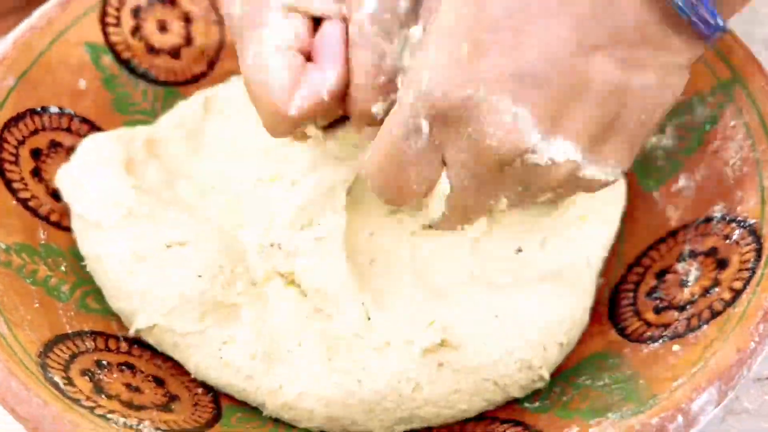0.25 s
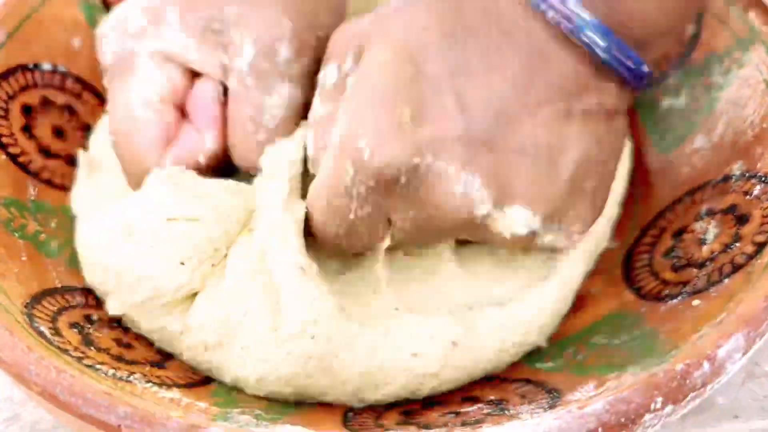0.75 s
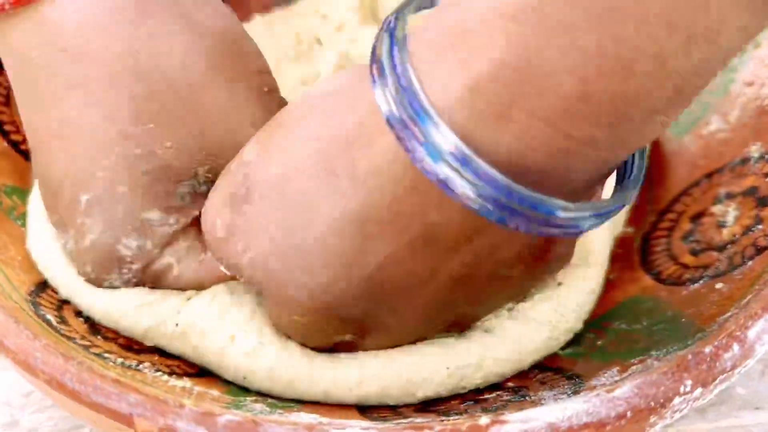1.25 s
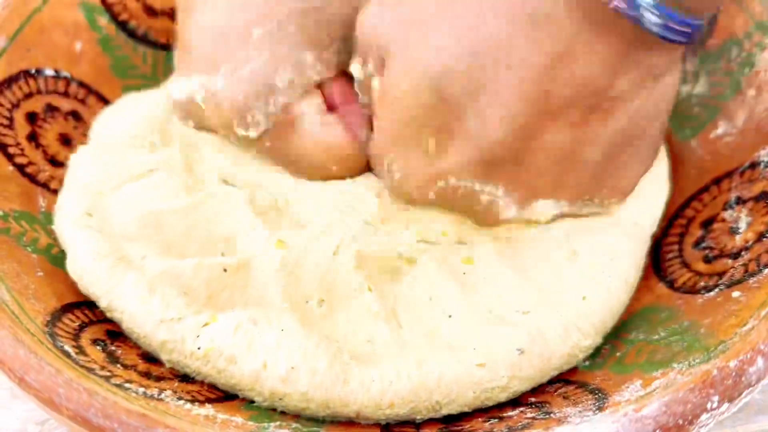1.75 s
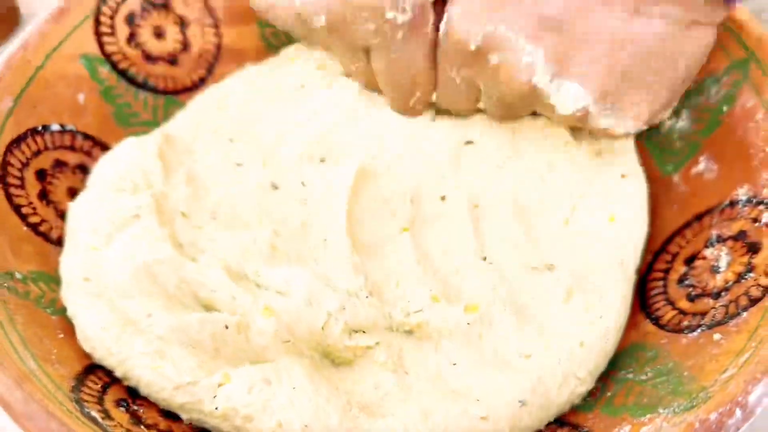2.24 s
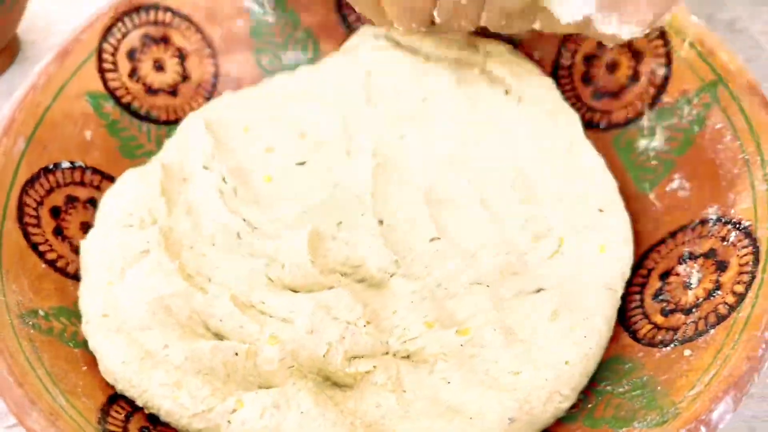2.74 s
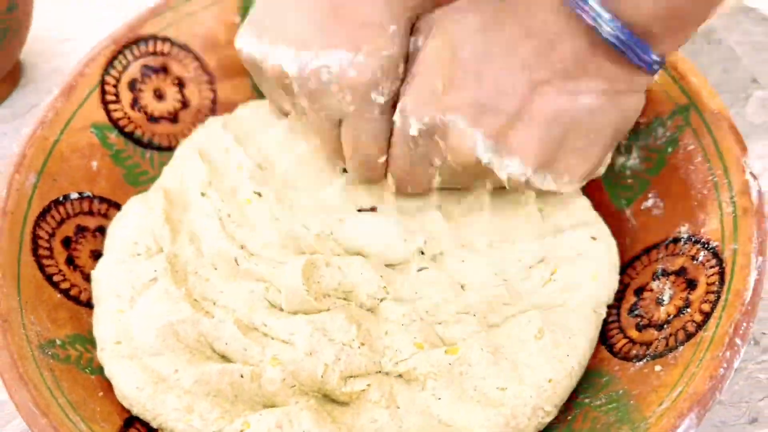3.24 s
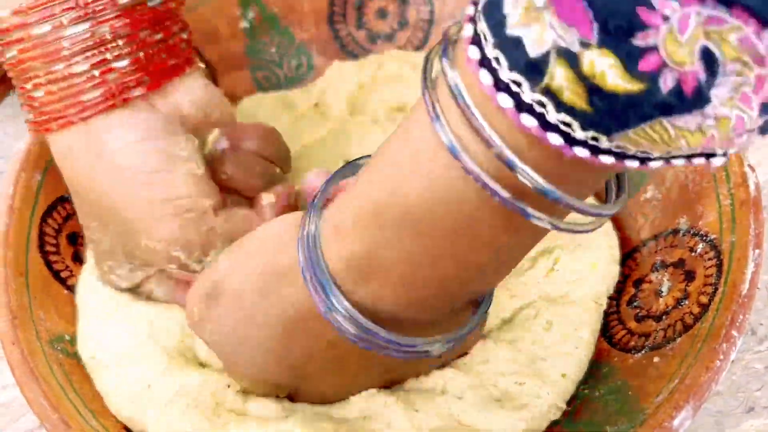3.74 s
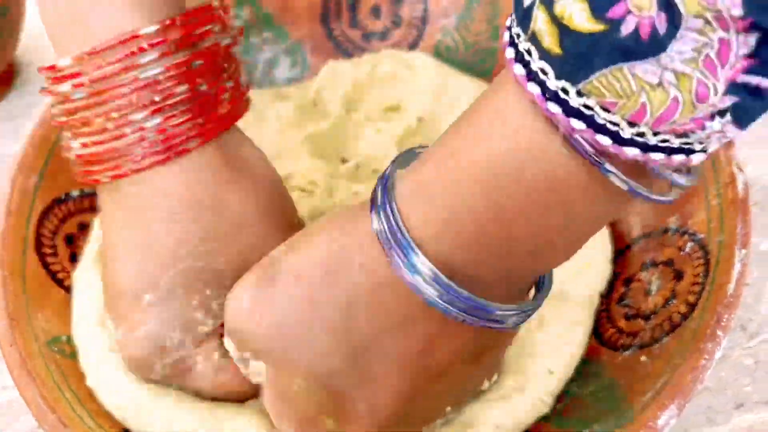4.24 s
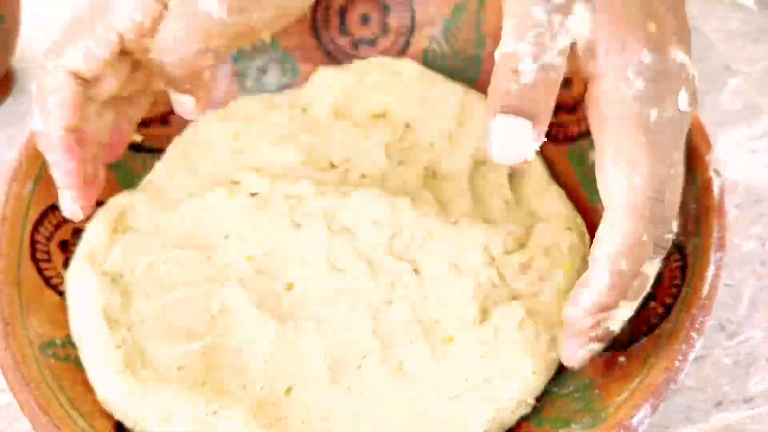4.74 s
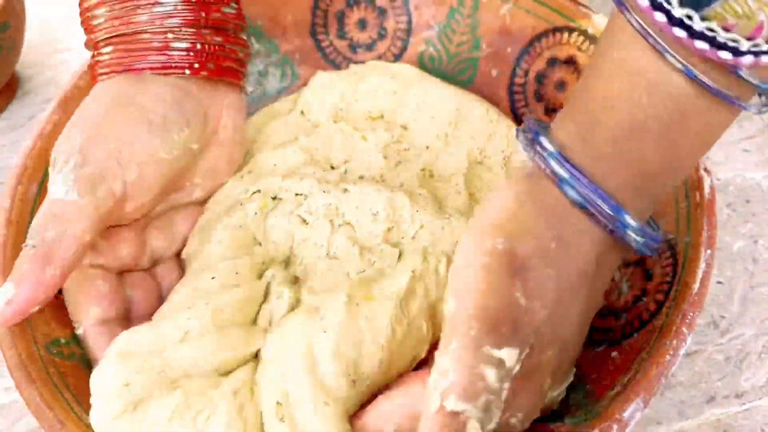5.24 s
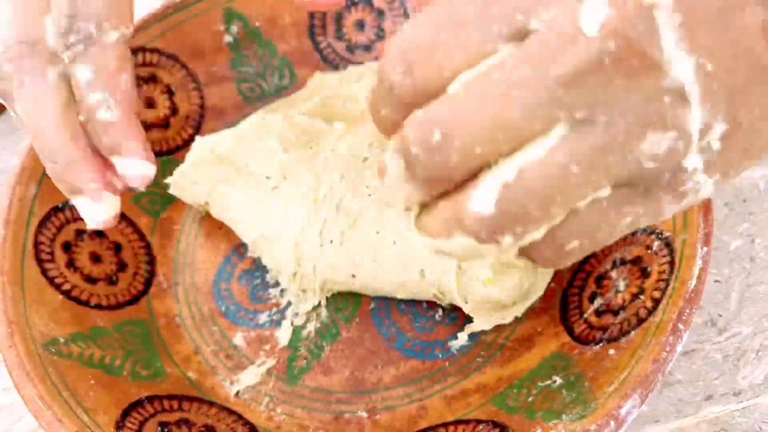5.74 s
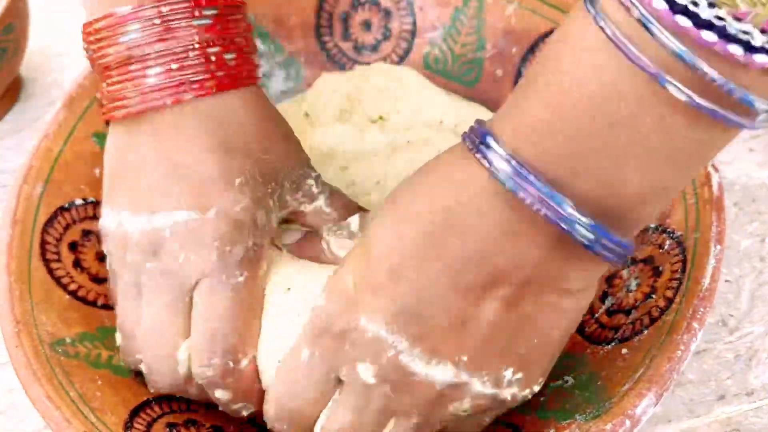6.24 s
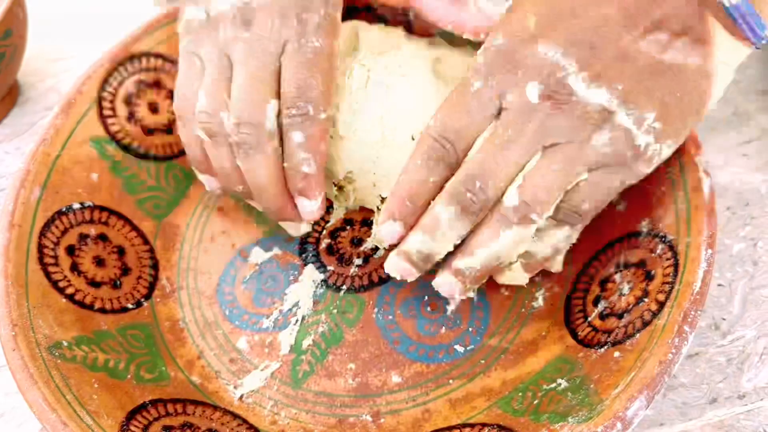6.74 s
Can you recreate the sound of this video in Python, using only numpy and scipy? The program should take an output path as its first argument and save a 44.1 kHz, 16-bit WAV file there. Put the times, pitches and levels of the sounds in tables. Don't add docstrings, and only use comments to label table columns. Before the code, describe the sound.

Close kneading of sticky dough, dull punches and peeling crackles, topped by sharp glassy bangle jingles and hard knocks on clay, in an open yard.

```python
import sys
import numpy as np
from scipy import signal
from scipy.fft import rfft, irfft
from scipy.io import wavfile
from scipy.ndimage import uniform_filter1d

SR = 44100
rng = np.random.default_rng(int(sys.argv[2]) if len(sys.argv) > 2 else 0)


def gain_from_decibels(decibels):
    exponent = np.asarray(decibels, float) / 20
    return 10 ** exponent


def to_wav(s):
    ch = np.atleast_2d(s).T
    pcm = np.round(np.clip(ch, -1, 1) * 32767)
    wavfile.write(sys.argv[1], SR, pcm.astype(np.int16))


N = 307818

# frequency in Hz, level in dB, decay time t60 in s.
STACK_MODES = [(7634, -8, 0.048), (8490, 0, 0.025), (8670, -8.5, 0.14), (9170, -5.5, 0.16),
               (9690, 2, 0.038), (10210, -1, 0.024), (13420, -2, .04), (12034, 3.5, 0.04),
               (12570, 2, 0.045), (14120, 6, .06), (14220, 2.5, 0.044), (14750, -0.5, 0.05),
               (15770, 4.5, 0.061), (15280, 0.5, 0.033)]


def evened(x):
    return x / np.sqrt(np.mean(x ** 2) + 1e-20)


def read(points, hz):
    f, value = np.transpose(points)
    return np.interp(np.log(hz + 1), np.log(f + 1), value)


def curve(rows, column):
    rows = np.array(rows)
    return np.interp(np.arange(N) / SR, rows[:, 0], rows[:, column])


def add(mix, s, sound):
    part = mix[round(s * SR):][:len(sound)]
    part += sound[:len(part)]


def coloured(x, points):
    response = gain_from_decibels(read(points, np.fft.rfftfreq(N, 1 / SR)))
    return evened(irfft(rfft(x) * response, N))


def resonate(x, hz, width):
    turn = np.exp(2j * np.pi * np.cumsum(hz * np.ones(len(x))) / SR)
    r = np.exp(-np.pi * width / SR)
    return 2 * (turn * signal.lfilter([1 - r], [1, -r], x / turn)).real


def rings(hz, db, t60, spread_db, rise, size=6000):
    t = np.arange(size) / SR
    luck = rng.standard_normal((2, len(hz), 1))
    level_db = db[:, None] + spread_db * luck[0] - 60 * t / t60[:, None]
    modes = gain_from_decibels(level_db) * np.sin(2 * np.pi * hz[:, None] * t + 3 * luck[1])
    return modes.sum(0) * (1 - np.exp(-t / rise))


def grains(per_s, spread_db, bed):
    size = gain_from_decibels(spread_db * np.minimum(rng.exponential(1, N), 4))
    return rng.standard_normal(N) * (size * (rng.random(N) < per_s / SR) + bed)


def air():
    # frequency in Hz, level in dB per Hz.
    mid_spectrum = [(25, -39.5), (40, -4.5), (55, 0.5), (100, -3), (200, -15), (500, -25), (930, -34.5),
                    (2500, -38), (5600, -48.5), (9000, -50), (10200, -63.5), (11300, -91), (12500, -66),
                    (15000, -66)]
    side_spectrum = [(24, -32), (40, 5.5), (104, -2), (800, -15), (1520, -17), (4100, -27.5), (9900, -33.5),
                     (14500, -49)]
    # time in s, level in dB.
    traffic = [(0, -1), (.8, 2.5), (2.2, 1.5), (3.4, -3), (6.2, -1.5), (6.98, -1.5)]
    mid = gain_from_decibels(-44) * coloured(rng.standard_normal(N), mid_spectrum)
    side = gain_from_decibels(-55) * coloured(rng.standard_normal(N), side_spectrum)
    hz, _, z = signal.stft(np.array([mid + side, mid - side]), SR, nperseg=1024)
    patches = uniform_filter1d(rng.standard_normal(z.shape[1:]), size=9, axis=0)
    patches = uniform_filter1d(patches, size=9, axis=1)
    z = z * gain_from_decibels(2.2 * evened(patches) * (hz[:, None] > 200))
    return gain_from_decibels(curve(traffic, 1)) * signal.istft(z, SR, nperseg=1024)[1][:, :N]


def engine():
    # time in s, pitch in Hz, level in dB.
    low = [(0, 46.7, -48.5), (.6, 51.7, -36), (1.2, 51.4, -37.5), (2.2, 58.1, -40), (3.2, 57.3, -42.5),
           (4.4, 52.9, -39), (5.4, 51.2, -44.5), (6.98, 55.25, -42.5)]
    high = [(0.0, 92.6, -43), (1.38, 93.2, -41), (4.74, 93.4, -43), (6.59, 97, -38), (6.98, 94.7, -39)]
    rev = [(5.6, 105.6, -69), (5.85, 113.3, -42), (6.1, 132.7, -39.5), (6.3, 120.4, -41.5),
           (6.45, 115, -39.5), (6.6, 128.7, -41.5), (6.8, 117.8, -43), (6.98, 103.5, -48.5)]
    out = np.zeros(N)
    # track, harmonic order, bandwidth in Hz, level in dB
    for rows, order, width, db in (low, 1, 7., 0), (high, 1, 12., 0), (rev, 1, 14., 0), (rev, 2, 50., -14.):
        hz = order * curve(rows, 1)
        tone = resonate(rng.standard_normal(N), hz, width)
        tone = evened(resonate(tone, hz, width))
        steady = tone / np.sqrt(uniform_filter1d(tone ** 2, size=6000) + 0.24)
        out += gain_from_decibels(curve(rows, 2) + db) * steady
    return out


def far_calls():
    # start in s, length in s, frequency in Hz, level in dB.
    calls = [
        (1.69, 0.23, 1665, -50),
        (3.445, 0.36, 1523, -47.5),
        (4.168, 0.23, 1920, -60),
        (5.75, 0.46, 1630, -50.5),
        (2.4, .16, 2800, -57),
        (.75, .5, 460, -54.5),
        (1.5, .35, 830, -57.5),
        (.55, .4, 640, -58),
        (3.0, 0.14, 850, -65),
    ]
    out = np.zeros(N)
    for s, length, hz, db in calls:
        band = resonate(rng.standard_normal(round(length * SR)), hz, 180)
        band = evened(resonate(band, hz, 180))
        add(out, s, gain_from_decibels(db) * band * signal.windows.tukey(len(band), .4))
    return out


def thuds():
    # start in s, peak in dB, centre in Hz, length in s.
    landings = [(0.125, -29.5, 510, 0.066), (0.739, -33.5, 494, 0.098), (0.849, -33, 437, 0.056),
                (1.034, -37, 474, 0.072), (1.357, -33.5, 549, 0.065), (1.623, -24.5, 628, 0.0053),
                (1.969, -29.5, 665, 0.051), (2.254, -32, 583, 0.013), (2.599, -36.5, 606, 0.052),
                (3.203, -33.5, 383, 0.019), (3.831, -24.5, 374, 0.015), (4.436, -30, 468, 0.055),
                (4.53, -37, 660, 0.012), (4.873, -27, 690, 0.039), (5.923, -20, 930, 0.03),
                (6.38, -40, 850, 0.052), (1.22, -38, 2430, 0.0053), (4.435, -25, 3010, 0.0059),
                (5.634, -30.5, 1140, 0.0077)]
    out, t = np.zeros(N), np.arange(5000) / SR
    for s, db, hz, length in landings:
        decay = gain_from_decibels(-30 * t / max(length, .004))
        puff = rng.standard_normal(len(t)) * decay * (1 - np.exp(-t / 0.0018))
        puff = resonate(puff, hz, 0.72 * hz)
        puff = resonate(puff, hz, 0.77 * hz)
        add(out, s, gain_from_decibels(db - 1.0) * puff / abs(puff).max())
    return out


def effort():
    # time in s, settling time in s, jingle in dB, crackle in dB.
    pushes = [(0, 0.44, -62, -53.5), (0.134, 0.19, -37.5, -38.5), (.41, 0.43, -49.5, -57),
              (0.731, .19, -36.5, -40), (.87, .08, -43.5, -50), (1.363, 0.087, -33, -35.5),
              (1.72, 0.24, -54, -51.5), (1.954, 0.85, -37.5, -41.5), (2.168, 0.092, -57, -67),
              (2.338, 0.88, -55, -54), (2.868, 0.55, -60, -58.5), (3.202, 0.16, -40, -41.5),
              (3.51, 0.38, -69, -58.5), (3.93, 0.15, -45, -46), (4.55, 0.053, -60, -59.5),
              (4.93, 0.75, -77, -54.5), (5.37, 0.13, -43.5, -49), (6.12, 0.065, -55, -57),
              (6.41, 0.14, -43, -52), (6.59, 0.11, -40, -60.5), (6.68, .2, -61.5, -66.5)]
    # time in s, swelling time in s, jingle in dB, crackle in dB.
    pulls = [(1.43, .08, -53, -49), (1.52, 0.098, -41.5, -45), (1.67, 0.085, -48, -50),
             (2.3, 0.05, -32.5, -52), (2.62, 0.099, -35, -38), (3.345, 0.1, -51.5, -49),
             (4.25, 0.29, -44, -52.5), (.3, 0.1, -48.5, -44), (5.33, 0.59, -56, -56.5),
             (5.549, 0.36, -50.5, -55.5), (5.86, .06, -53.5, -59), (6.037, 0.13, -36.5, -38),
             (6.392, 0.23, -37.5, -42)]
    # time in s, settling time in s, jingle in dB, crackle in dB.
    slaps = [
        (1.024, 0.23, -42.5, -51),
        (3.831, 0.085, -32.5, -34.5),
        (4.087, 0.22, -43.5, -59),
        (4.432, 0.18, -38, -40.5),
        (4.873, .07, -50, -40.5),
        (5.763, 0.19, -42, -64),
        (5.924, .12, -49, -50.5),
        (6.842, 0.12, -41, -42.5),
        (6.942, .16, -37.5, -49),
    ]
    push_rise_s, slap_rise_s, free_s = 0.047, 0.006, 0.048
    t, power = np.arange(0, N + 64, 64) / SR, 0
    moves = [(s, push_rise_s, slow, db) for s, slow, *db in pushes]
    moves += [(s, slow, free_s, db) for s, slow, *db in pulls]
    moves += [(s, slap_rise_s, slow, db) for s, slow, *db in slaps]
    for s, rise, fall, db in moves:
        away = np.maximum((s - t) / max(rise, .004), (t - s) / max(fall, .01))
        power = power + gain_from_decibels(np.array(db)[:, None] - 23.5 * away ** 1.366) ** 2
    clumps = evened(uniform_filter1d(rng.standard_normal((2, len(t))), size=5, axis=1))
    gains = gain_from_decibels(3.2 * clumps) * np.sqrt(power)
    return [np.interp(np.arange(N) / SR, t, gain) for gain in gains]


def kneading():
    # frequency in Hz, level in dB per Hz.
    jingle_spectrum = [(4500, -30.5), (6500, -11), (9000, -5), (11500, -10.5), (14500, -6), (16000, -13)]
    crackle_spectrum = [(200, -27.5), (500, -3.5), (1200, -2.5), (2900, -4.5), (5600, -9), (10000, -7.5)]
    squish_spectrum = [(150, -18), (450, -8), (1500, -24.5)]
    hz, db, t60 = np.transpose(STACK_MODES + STACK_MODES)
    own_hz = hz * (1 + 0.018 * rng.standard_normal(len(hz)))
    touches = np.zeros(N)
    for mode_hz, mode_db, mode_t60 in zip(own_hz, db, t60):
        touches += gain_from_decibels(mode_db) * resonate(grains(120, 2.5, 0.03), mode_hz, 3.0 / mode_t60)
    jingle = evened(.9 * evened(touches) + coloured(grains(4000, 3.2, .25), jingle_spectrum))
    dough = coloured(grains(2200, 3.3, 0.25), crackle_spectrum)
    dough = dough + gain_from_decibels(-8.5) * coloured(grains(600, 3.0, 0.17), squish_spectrum)
    shake, press = effort()
    shake = np.minimum(shake, gain_from_decibels(-34))
    return gain_from_decibels(1.0) * shake * jingle + gain_from_decibels(-1.3) * press * dough


def knocks():
    # start in s, peak in dB, then relative levels in dB of the
    strikes = [(0.2011, -10.5, -2, -1.5, -15), (0.2083, -19, -11.5, 1.5, -13.5),
               (2.029, -8.5, -10, -1, -8.5), (2.0416, -18, -0.5, -36, -23), (2.098, -42, -20, -20, -30),
               (2.126, -32.5, -20.5, -21, -30), (2.172, -33, -22, -24, -30), (2.203, -50, -20, -20, -30),
               (2.254, -24.5, -11.5, -9, -27), (3.2482, -12, -7, -10, -13), (3.2561, -6, -16, -9.5, -15),
               (3.2748, -18, -27, -19, -10), (3.9206, -18.5, 3.5, 7.5, -15), (4.873, -28, -7, -3, -5.5),
               (4.8993, -26.5, -9, -9.5, -0.5), (5.9219, -22.5, -9, -11, -36),
               (5.9619, -21, 4.5, -4.5, -10), (6.044, -27.5, -5, -11, -38), (6.8424, -29, 3, -11, 0.5),
               (6.8724, -20.5, -8, -1, -27), (6.885, -17.5, -8.5, -11, -14)]
    # frequency in Hz, level in dB, decay time t60 in s.
    modes = [(2547, -0.5, 0.044), (2513, -4, 0.044), (2865, -1.5, 0.025), (2180, -6.5, .015),
             (1688, -8.5, .05), (986, -1.5, 0.042), (3540, -3.5, 0.037), (5847, 1, 0.03),
             (7180, -6.5, 0.04), (415, -5, .065), (3860, -10, .02), (2547, -24.5, .4), (1230, -4.5, 0.022)]
    groups = [0, 0, 2, 2, 1, 1, 2, 2, 2, 3, 2, 0, 1]
    out, t = np.zeros(N), np.arange(14000) / SR
    hz, mode_db, t60 = np.transpose(modes)
    for s, db, *parts_db in strikes:
        spot_hz = hz * (1 + 0.0056 * rng.standard_normal(len(hz)))
        spot_db = mode_db + np.array([0, *parts_db])[groups]
        ring = rings(spot_hz, spot_db, t60, 2.2, 0.00046, size=len(t))
        skid = 1 + 1.3 * uniform_filter1d(rng.standard_normal(len(t)), size=25)
        crack_gain = gain_from_decibels(-3.0 + parts_db[1] / 2 - 60 * t / 0.028) * (1 - np.exp(-t / 0.0011))
        crack = rng.standard_normal(len(t)) * crack_gain
        add(out, s, gain_from_decibels(db - 1.5) * (ring * skid + crack))
    return out


def clinks():
    # start in s, peak in dB, clearest ring in Hz.
    meetings = [(0.1998, -4.5, 8830), (0.2722, -18.5, 9170), (0.471, -18, 9730), (1.397, -3, 9200),
                (1.473, -14.5, 8700), (1.651, -7.5, 9320), (1.7184, -27, 8970), (1.728, -13, 9360),
                (2.0085, -8.5, 9100), (2.019, -11, 7850), (2.0284, 2, 7700), (2.117, -13.5, 8940),
                (2.258, -19, 9140), (2.8694, -14.5, 9050), (3.217, -15.5, 8800), (3.251, -11.5, 8630),
                (3.8307, -22, 8500), (3.917, -10.5, 8390), (4.054, -18.5, 9200), (4.217, -20, 9690),
                (5.856, -14.5, 9200), (5.9612, -7, 9000), (6.006, -21.5, 8700), (6.0447, -15, 8440),
                (6.08, -14, 8800), (6.106, -18, 9200), (6.123, -17.5, 8490), (6.513, -12.5, 9700),
                (6.596, -8, 9080), (6.874, -12, 9200)]
    # start in s, peak in dB, clearest ring in Hz, chatter in s.
    rattles = [(0.111, -32, 8220, .012), (0.127, -13.5, 9640, 0.0086), (0.398, -30, 9500, 0.0097),
               (0.722, -22.5, 8600, 0.023), (1.022, -15.5, 9260, 0.0084), (1.044, -10, 9000, 0.011),
               (1.319, -35, 8360, 0.011), (1.341, -14, 9750, 0.016), (1.958, -12.5, 8800, 0.0065),
               (2.099, -18, 8700, 0.017), (2.239, -23.5, 8980, 0.0096), (2.291, -12.5, 9300, 0.011),
               (2.575, -41.5, 9200, 0.0085), (2.596, -16.5, 9090, 0.0077), (3.196, -16, 9300, 0.0097),
               (3.498, -38.5, 8170, 0.019), (4.085, -12.5, 8920, 0.011), (4.161, -18.5, 8900, 0.0095),
               (4.178, -15, 8700, 0.014), (4.097, -16.5, 9100, 0.01), (4.1405, -17, 8600, 0.011),
               (2.121, -17.5, 9300, 0.0079), (6.505, -21.5, 9300, 0.012), (1.935, -30, 9100, .012),
               (6.626, -15, 9000, 0.0092), (6.132, -19, 8360, 0.0047), (4.43, -32, 8400, 0.014),
               (4.4985, -18, 9070, 0.0098), (5.769, -9, 9120, 0.015), (6.6157, -8.5, 9360, 0.0077),
               (6.84, -13, 9070, 0.0059), (6.854, -19.5, 9200, .008), (6.9445, -22.5, 8620, 0.014)]
    # start in s, peak in dB.
    light_touches = [(0.339, -26.5), (.454, -28.5), (0.538, -30.5), (.8086, -18.5), (.922, -33),
                     (.934, -30), (.942, -26), (.99, -34), (1.137, -26), (1.069, -12.5), (1.424, -14.5),
                     (2.309, -11.5), (2.712, -36), (3.237, -19), (3.2989, -20.5), (3.388, -34.5),
                     (3.529, -23), (4.023, -24.5), (4.033, -31), (4.256, -22.5), (4.349, -34),
                     (5.607, -40.5), (5.66, -39.5), (5.761, -19.5), (5.8337, -20), (5.926, -25.5),
                     (5.977, -20), (6.546, -24), (.2354, -18.5), (0.262, -24), (.3, -29.5), (.796, -25),
                     (.857, -30), (1.12, -25), (1.309, -41), (1.607, -29), (1.866, -40), (2.1685, -30),
                     (2.178, -33), (2.494, -41), (2.566, -28), (2.821, -32.5), (2.851, -27), (3.952, -28),
                     (4.128, -23), (4.192, -22), (4.228, -24.5), (5.944, -33), (6.022, -26), (6.396, -19.5),
                     (6.574, -30), (6.588, -30), (6.776, -47.5)]
    # frequency in Hz, level in dB, decay time t60 in s.
    body_modes = [(4120, -4.5, .03), (4540, -0.5, 0.032), (5000, -1.5, 0.022), (5900, -11, 0.014)]
    out, t = np.zeros(N), np.arange(3000) / SR
    hz, mode_db, t60 = np.transpose(STACK_MODES)
    body_hz, body_db, body_t60 = np.transpose(body_modes + body_modes + body_modes)
    events = rattles + [(*row, 0.0052) for row in meetings]
    events += [(s, db, 8700 + 430 * rng.standard_normal(), 0.0031) for s, db in light_touches]
    for s, db, ring_hz, chatter in events:
        luck = rng.random((3, len(t)))
        u = t / np.clip(chatter, .001, .03)
        force = np.sign(luck[1] - .5) * luck[2] ** 2
        touches = (luck[0] < .06) * force * (u + .04) ** 0.81 * np.exp(-u * 1.87)
        touches[30] = .1
        clear = rings(np.array([ring_hz]), np.array([2.5]), np.array([.03]), 0.92, 0.00023)
        stack_hz = hz * (1 + 0.014 * rng.standard_normal(len(hz)))
        stack = rings(stack_hz, mode_db, 0.33 * t60, 2.7, 0.0001)
        sizes = rng.uniform(.92, 1.12, len(body_hz))
        body = rings(body_hz * sizes, body_db, body_t60, 5.0, 0.00021)
        crack = np.diff(rng.standard_normal(6001)) * gain_from_decibels(-2.0 - 60 * np.arange(6000) / SR / 0.004)
        response = clear + gain_from_decibels(7.5) * stack + crack + gain_from_decibels(-16.5) * body
        sound = signal.fftconvolve(touches, response)
        sound *= 1 + 1.1 * uniform_filter1d(rng.standard_normal(len(sound)), size=20)
        add(out, s - .0012, gain_from_decibels(db + 2.5) * sound / abs(sound).max())
    return out


def yard(x, channels):
    size = 6000
    taps = rng.choice([-1., 1.], (channels, size)) * (rng.random((channels, size)) < .05)
    taps *= gain_from_decibels(-60 * np.arange(size) / SR / 0.068) * (np.arange(size) > 60)
    return signal.fftconvolve(x[None], taps / np.linalg.norm(taps[0]), axes=1)[:, :N]


def ports(x):
    # frequency in Hz, lead of the left in radians.
    lead = [(0, 0), (750, .7), (1450, 2.8), (2550, 7.35), (4100, 6.3), (7000, 7.6), (8500, 6.3),
            (9600, 5.1), (10400, 3.4), (11200, 3.14), (12000, 2.8), (12900, 1.1), (13900, .2), (15000, -.1),
            (15600, -.8)]
    # frequency in Hz, left minus right in dB.
    difference = [(150, -1), (700, 3), (1300, 1), (2400, 0), (4400, 5), (7500, 0)]
    hz = np.fft.rfftfreq(N, 1 / SR)
    half = gain_from_decibels(read(difference, hz) / 2) * np.exp(.5j * np.interp(hz, *np.transpose(lead)))
    return irfft(rfft(x) * np.array([half, 1 / half]), N)


def scene():
    hands = clinks() + knocks() + thuds() + kneading()
    ahead = ports(hands + gain_from_decibels(-16) * yard(hands, channels=1)[0] + far_calls())
    dull = signal.sosfilt(signal.butter(3, 8500 / (SR / 2), output="sos"), hands)
    return ahead + gain_from_decibels(-3.0) * yard(dull, channels=2) + engine() + air()


def stereo_squeeze(x, under_db):
    hz, _, z = signal.stft(np.array([x[0] + x[1], x[0] - x[1]]) / 2, SR, nperseg=512, noverlap=384)
    power = uniform_filter1d(abs(z) ** 2, size=9, axis=1)
    power = uniform_filter1d(power, size=8, axis=2)
    treble = power[:, hz > 2500].sum((0, 1))
    sudden = treble > 1.15 * uniform_filter1d(treble, size=36)
    spared = sudden & (abs(hz[:, None] - 11200) < 1000)
    masked = power < power[::-1] / gain_from_decibels(2 * under_db)
    weak = masked & (hz[:, None] > hz[hz > 2500][0]) & ~spared
    mid, side = signal.istft(z * ~weak, SR, nperseg=512, noverlap=384)[1][:, :N]
    return np.array([mid + side, mid - side])


def roll_off(x):
    return signal.sosfilt(signal.butter(12, 16620, fs=SR, output="sos"), x)


def record(dry):
    low_pass = signal.firwin(255, 15900, window=("kaiser", 8), fs=SR)
    band = signal.oaconvolve(dry, low_pass[None], "same")
    mix = np.clip(stereo_squeeze(band, under_db=9), -1, 1)
    return roll_off(mix)


dry = scene()
out = record(dry)
to_wav(out)
```